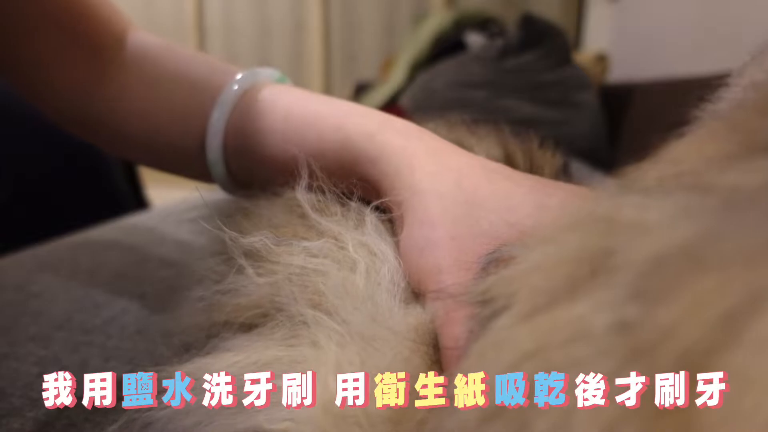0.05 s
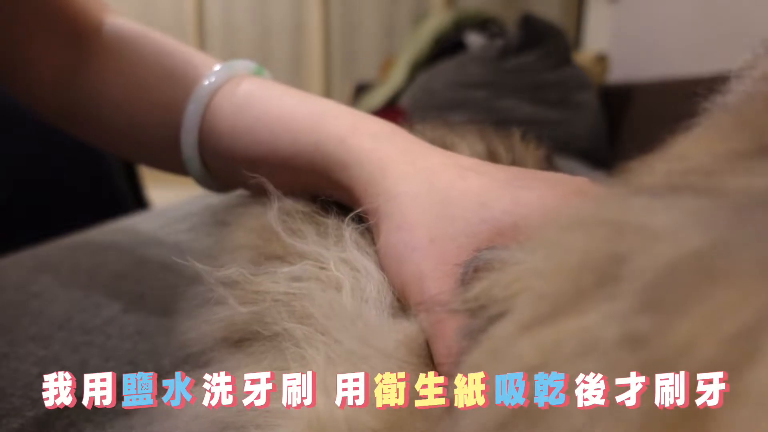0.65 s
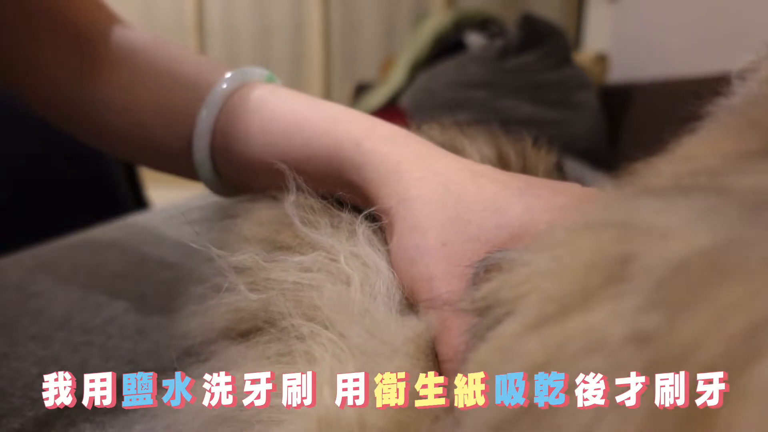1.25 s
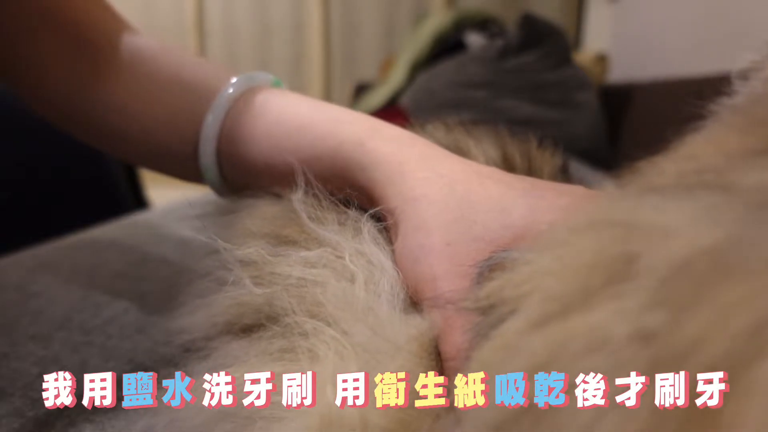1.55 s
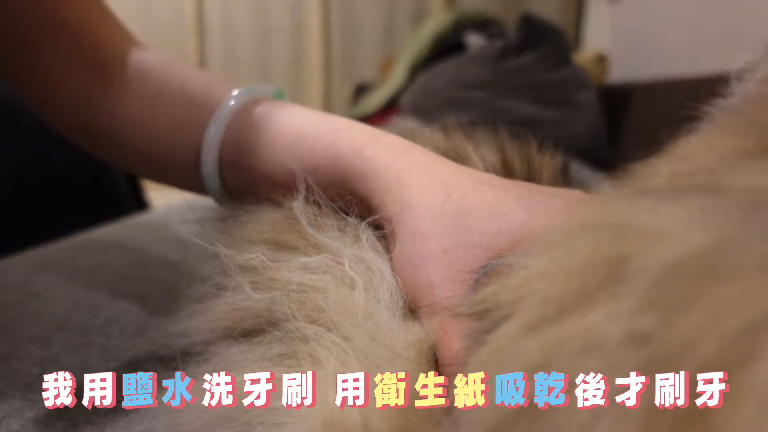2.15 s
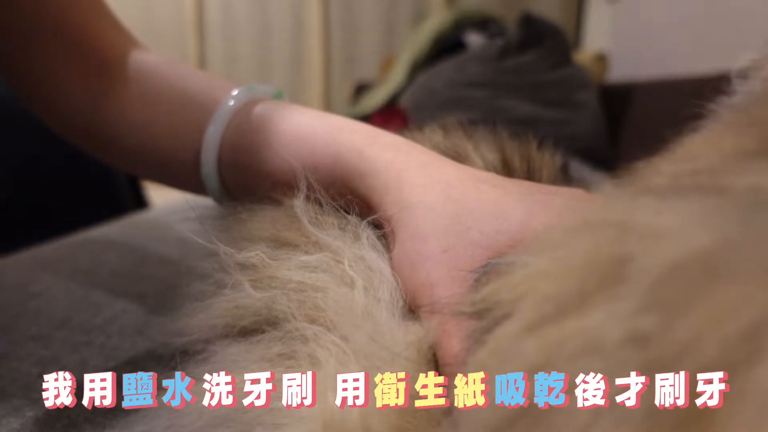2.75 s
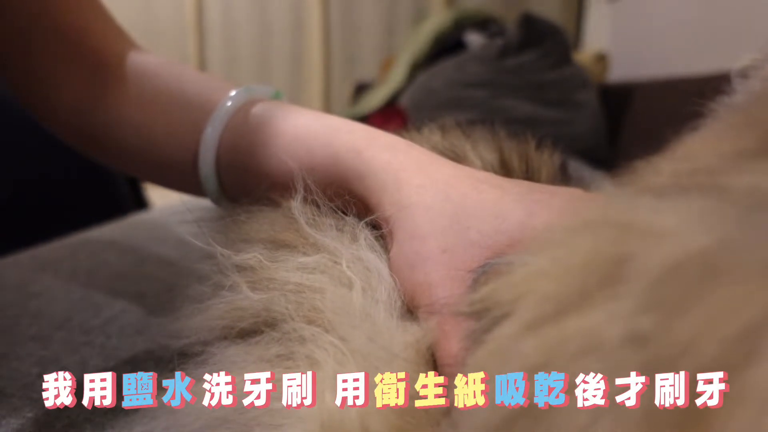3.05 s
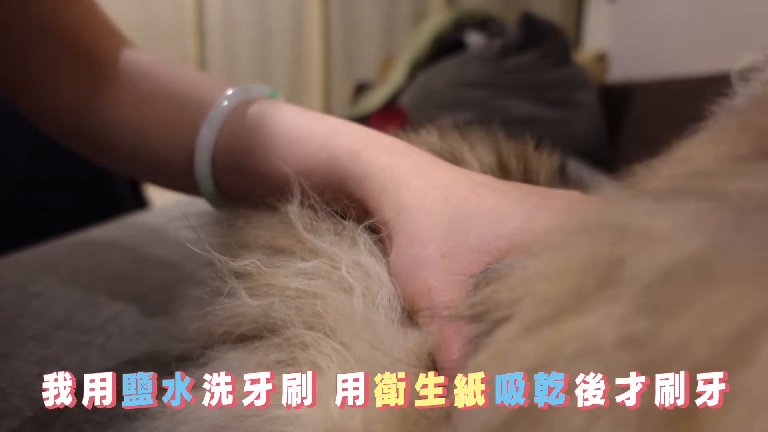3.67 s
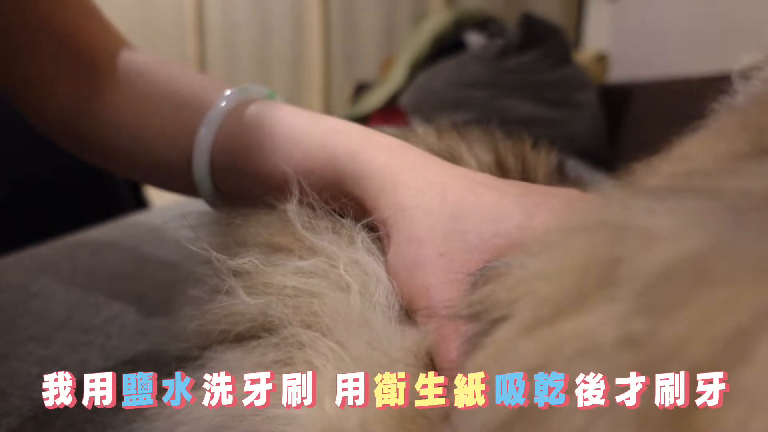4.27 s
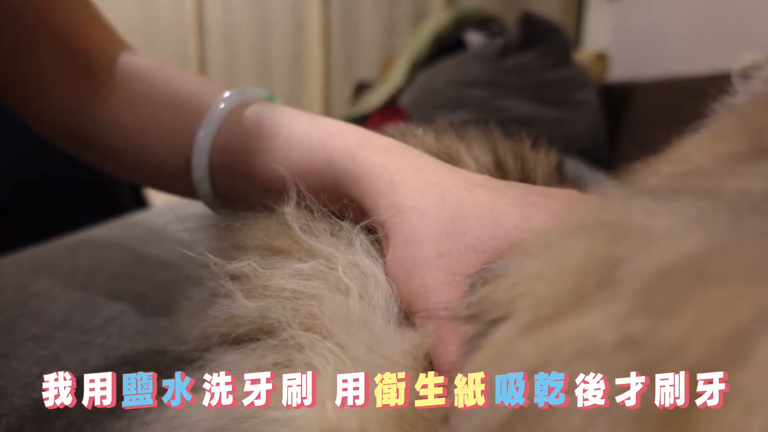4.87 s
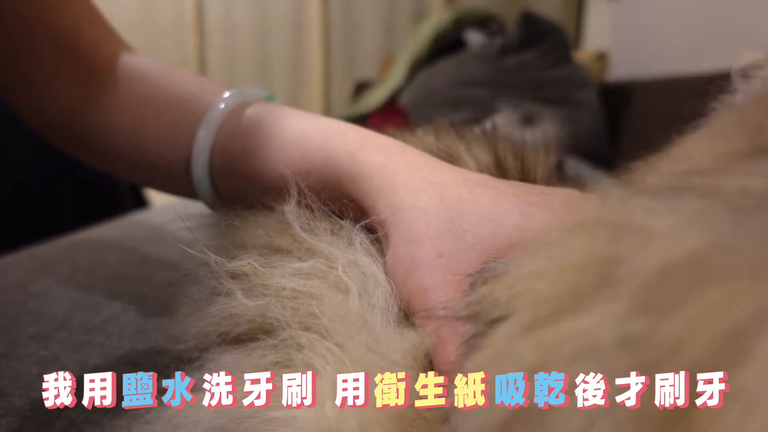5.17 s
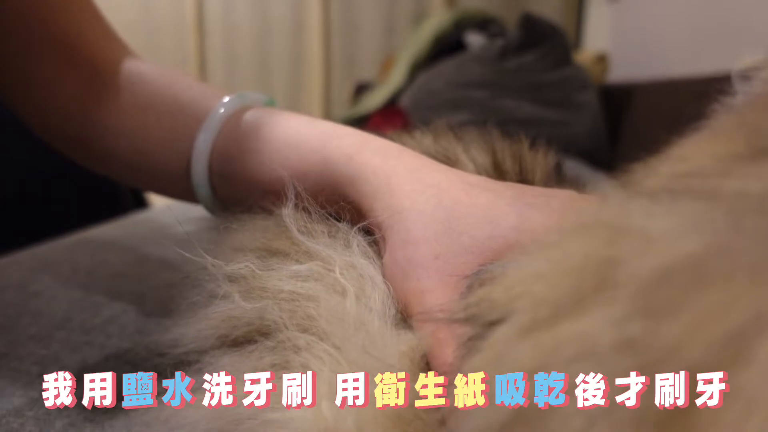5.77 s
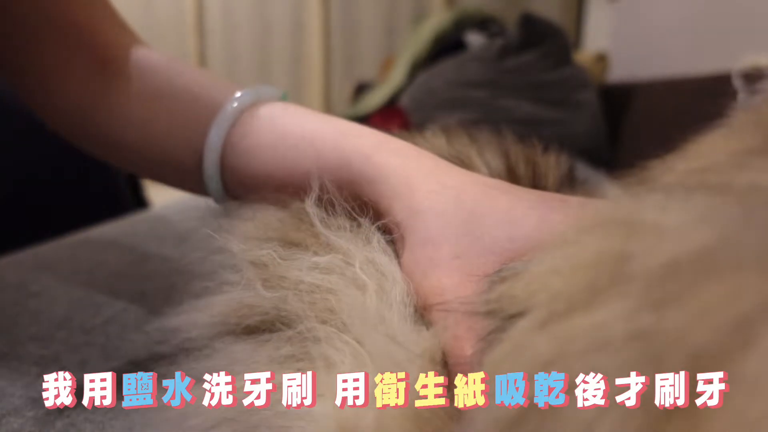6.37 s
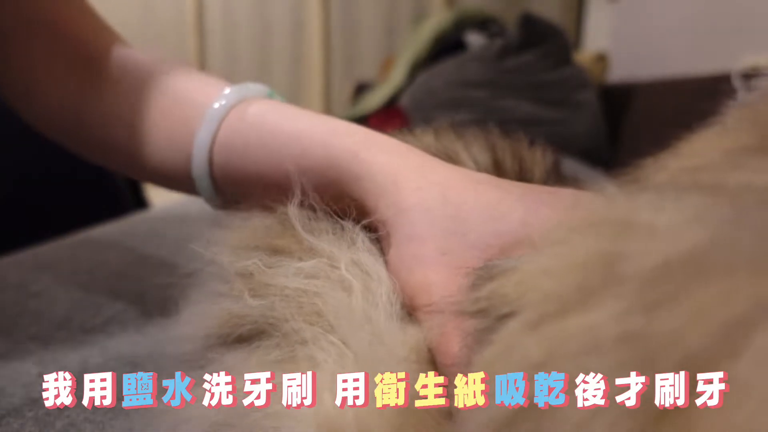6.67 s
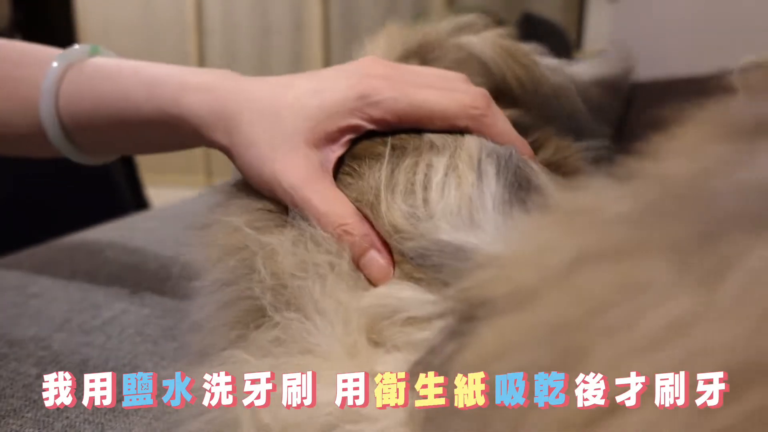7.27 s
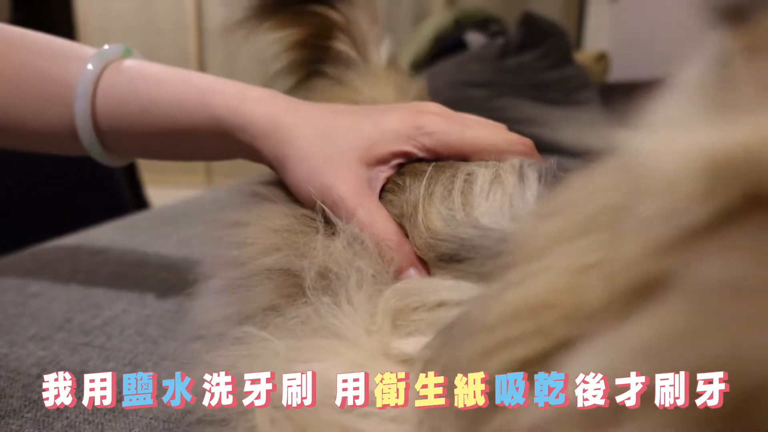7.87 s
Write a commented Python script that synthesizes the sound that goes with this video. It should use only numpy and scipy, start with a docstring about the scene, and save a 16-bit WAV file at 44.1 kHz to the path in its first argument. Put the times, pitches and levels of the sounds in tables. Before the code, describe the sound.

Soft fur rustling, then a toothbrush rubbing and scrubbing a dog's teeth with faint squeaks and small ticks, over low room hiss.

```python
"""A dog's teeth are brushed close to the microphone, over the soft hiss of a quiet room.
First a hand rustles in the fur, with one sharp tick; faint hollow tones come and go from here on.
At 1.8 s the brush scrubs briefly, then makes quick light strokes whose squeaks arch with their speed.
From 4.5 s heavier scrubs take over. Strokes swell to their hardest press and ease off, among dull
snags and later ticks. After 6 s the hand rustles again, with two last ticks."""
import sys
import numpy as np
from scipy import signal
from scipy.fft import rfft, irfft
from scipy.io import wavfile

SR = 44100
rng = np.random.default_rng(int(sys.argv[2]) if len(sys.argv) > 2 else 0)


def pcm_store(signal):
    """Save signal as 16-bit PCM."""
    levels = np.round(np.clip(np.atleast_2d(signal), -1, 1) * 32767)
    wavfile.write(sys.argv[1], SR, levels.astype(np.int16).T)


N = 349713
TIME, FREQ = np.arange(N) / SR, np.fft.rfftfreq(N, 1 / SR)


def amp(db):
    """Decibels to gain."""
    return 10 ** (np.asarray(db) / 20)


def unit_rms(x):
    """Scales to rms 1; a stereo pair by its mid signal."""
    return x / np.sqrt(np.mean(np.atleast_2d(x).mean(0) ** 2) + 1e-20)


def spectrum(table):
    """Table columns interpolated over log frequency."""
    hz, *columns = np.transpose(table)
    return [np.interp(np.log(FREQ + 1), np.log(hz + 1), column) for column in columns]


def wander(rate_hz):
    """Random drift, rms 1."""
    knots = np.arange(0, TIME[-1] + 1, 1 / rate_hz)
    return unit_rms(np.interp(TIME, knots, rng.standard_normal(N)[:len(knots)]))


def resonance(hz, half_width_hz):
    """Gain of a steep-skirted peak."""
    return 1 / (1 + ((FREQ - hz) / half_width_hz) ** 2 / 2) ** 2


def highpass(x, hz):
    """Steep zero-phase high-pass."""
    return irfft(rfft(x) / (1 + (hz / (FREQ + 1)) ** 12), N)


def bandpass(x, centre_hz, spread_oct):
    """Gaussian band on a log frequency axis."""
    hz = np.fft.rfftfreq(x.shape[-1], 1 / SR) + 1
    return irfft(rfft(x) * np.exp(-.5 * (np.log2(hz / centre_hz) / spread_oct) ** 2))


def pan(balance_db):
    """Left and right gains; positive is left."""
    return amp(np.vstack([balance_db / 2, -balance_db / 2]))


def stereo_noise(colour, image, envelope=1):
    """Two independent noises, modulated, filtered and mixed to left and right."""
    coherence, balance_db = spectrum(image)
    coherence = np.clip(coherence, 0, 1)
    left, other = rfft(rng.standard_normal((2, N)) * envelope) * colour
    right = coherence * left + np.sqrt(1 - coherence ** 2) * other
    return irfft(np.array([left, right]) * pan(balance_db), N)


def stroke(row, curve, fizz_follows):
    """Level and fizz along a stroke, easing off either side of the hardest press."""
    start_s, length_s, level_db, press, easing_db, fizz_db = row[:6]
    progress = np.linspace(0, 1, 33)
    drop_db = easing_db / 2 * (2 * abs(progress - press)) ** curve
    fizz_db = fizz_db + (1 - fizz_follows) * drop_db
    return np.transpose([start_s + length_s * progress, level_db - drop_db, fizz_db])


def contact(moves, attack_s, release_s):
    """Envelopes of body and fizz (treble); both stop when the surfaces part."""
    body, fizz = np.zeros((2, N))
    for move in moves:
        knots_s, level_db, fizz_db = np.transpose(move)
        start_s, end_s = knots_s[0], knots_s[-1]
        span = slice(max(int((start_s - attack_s) * SR), 0), int((end_s + release_s) * SR))
        t = TIME[span]
        touch = np.clip(np.minimum((t - start_s) / attack_s, (end_s - t) / release_s) + .5, 0, 1)
        body[span] += touch * amp(np.interp(t, knots_s, level_db))
        fizz[span] += touch * amp(np.interp(t, knots_s, level_db + fizz_db))
    return body, fizz


def friction(envelopes, colour, image, grain_db, clump_db, clump_hz, body_db, fizz_db, top_db, top_power):
    """Countless tiny slips, uneven and clumped, sound through a body."""
    body, fizz = envelopes
    slip_size = amp(grain_db * wander(3000) + clump_db * wander(clump_hz))
    rub = stereo_noise(colour, image, slip_size)
    treble = highpass(rub, 6600)
    low, treble = unit_rms(rub - treble), unit_rms(treble)
    top = highpass(treble, 7700)
    # faster sliding shortens the slips: the top grows faster than the rest of the fizz
    top_gain = amp(top_db) * np.clip(fizz / (body + 1e-9), .1, 1) ** top_power
    return amp(body_db) * body * low + amp(fizz_db) * fizz * (treble + (top_gain - 1) * top)


# hiss spectrum: (frequency [Hz], gain [dB])
AIR_SPECTRUM = [(25, -44), (60, -33), (120, -22), (220, -16.5), (400, -12), (600, -9), (720, -3), (900, -8),
                (1120, -0.5), (1700, -5.5), (2200, -5), (2900, -10.5), (6900, -16), (15500, -24.5)]
# stereo image: (frequency [Hz], coherence [0-1], left minus right [dB])
AIR_STEREO = [(60, .995, 5), (98, 0.93, -2.5), (249, 0.47, 2), (624, 0.16, -5.5), (1030, 0.03, 6),
              (2570, 0.11, 1), (7400, 0.1, 1.5), (13500, 0.97, 0)]
# room resonances: (frequency [Hz], half-width [Hz], level [dB], waver [dB])
AIR_MODES = [(97, 9, -97, 1), (603, 55, -73, 2.4), (1130, 110, -76, 1)]


def air(hiss_db=-60.5):
    """Steady room hiss with a few wavering resonances."""
    out = amp(hiss_db) * unit_rms(stereo_noise(amp(spectrum(AIR_SPECTRUM)[0]), AIR_STEREO))
    for hz, half_width_hz, level_db, waver_db in AIR_MODES:
        gain = amp(level_db + waver_db * wander(22))
        out += gain * unit_rms(stereo_noise(resonance(hz, half_width_hz), AIR_STEREO))
    return out


# hand moves, one curve each: (time [s], level [dB], fizz re level [dB])
FUR_MOVES = [
    [(0.0, -42, -5.5), (0.066, -52.5, -6), (0.12, -49.5, 1.5), (0.148, -55, -6), (0.23, -67, -4),
     (0.276, -57, -10), (0.3, -64, -6)],
    [(0.3, -60, -6), (0.39, -46.5, -5), (0.486, -52.5, -4.5), (0.494, -44.5, -4.5), (0.556, -53.5, -7),
     (0.628, -39.5, -7.5), (0.78, -58, -8)],
    [(0.78, -54, -7), (0.864, -49.5, -5), (0.888, -48, -8.5), (1.006, -50, -6.5), (1.04, -58, -5),
     (1.108, -51, -7), (1.15, -59.5, -4)],
    [(1.15, -54.5, -8), (1.216, -50.5, -3.5), (1.51, -54.5, -9.5), (1.608, -53.5, -8), (1.706, -62.5, -11),
     (1.734, -57.5, -11), (1.8, -72, -8)],
    [(6.07, -67, -4), (6.206, -58.5, -2), (6.28, -72, -3), (6.29, -74, 2)],
    [(6.53, -70, 1), (6.576, -73, 0.5), (6.74, -58, -4), (6.848, -61, -7.5), (7.258, -56.5, -6.5),
     (7.274, -63, -4), (7.38, -72, -6)],
]
# rustle spectrum: (frequency [Hz], gain [dB])
FUR_SPECTRUM = [(400, -37), (900, -33), (1500, -6), (2150, -6), (2900, -2.5), (3700, -0.5), (4300, -1.5),
                (5200, -1), (7000, -7.5), (9000, -11.5), (12000, -19.5), (15500, -29.5)]
# rustle resonances: (frequency [Hz], half-width [Hz], added part re spectrum [dB])
FUR_RESONANCES = [(2200, 37, -4), (3470, 120, -15), (4990, 57, -2.5), (5460, 94, -8.5), (6670, 120, -10)]
# stereo image: (frequency [Hz], coherence [0-1], left minus right [dB])
FUR_STEREO = [(600, .3, 8), (1300, 0.23, 3), (2550, 0.44, 9.3), (4800, 0.79, 4.1), (7350, 0.48, 7.5),
              (12000, 0.47, 2.5)]


def fur_rustle():
    """A hand slides through fur: soft, slightly hollow friction to the left."""
    peaks = sum(amp(db) * resonance(hz, half_width_hz) for hz, half_width_hz, db in FUR_RESONANCES)
    colour = amp(spectrum(FUR_SPECTRUM)[0]) * (1 + peaks)
    envelopes = contact(FUR_MOVES, attack_s=.013, release_s=.014)
    return friction(envelopes, colour, FUR_STEREO, grain_db=.5, clump_db=1.46, clump_hz=90,
                    body_db=-.5, fizz_db=-1, top_db=-.5, top_power=.16)


# hard contacts: (time [s], peak [dB], centre [Hz])
TICK_HITS = [(0.8915, -25.5, 3800), (4.523, -38, 1300), (5.651, -30, 3500), (5.7675, -37, 2400),
             (5.916, -28, 2600), (5.9185, -29, 3500), (5.953, -28, 2700), (5.9855, -29, 3300),
             (6.9475, -41, 2300), (7.251, -34, 2100)]


def ticks(decay_s=.0005, spread_oct=.8):
    """Single hard contacts: snaps that die within a millisecond or two."""
    out, t = np.zeros(N), np.arange(1024) / SR
    for time_s, peak_db, centre_hz in TICK_HITS:
        burst = rng.standard_normal(len(t)) * np.exp(-t / decay_s)
        snap = bandpass(np.roll(burst, 32), centre_hz, spread_oct)  # roll: space for pre-ringing
        out[int(time_s * SR):][:len(t)] += amp(peak_db) * snap / abs(snap).max()
    return out * pan(balance_db=2.4)


# swells: (peak time [s], length [s], frequency [Hz], half-width [Hz], level [dB], left minus right [dB])
HOLLOW_SWELLS = [(1.2, 0.074, 580, 32, -66.5, -2), (1.563, 0.65, 2080, 280, -53.5, 7.5),
                 (6.12, 0.15, 600, 50, -60.5, -16), (6.411, 0.042, 580, 45, -63, -18),
                 (6.86, .1, 250, 69, -76, -6), (7.184, 0.41, 3900, 570, -60, 3),
                 (7.0, 0.91, 1620, 700, -63, 2), (7.265, 0.05, 260, 60, -70, -2),
                 (7.78, 0.35, 626, 66, -60.5, -22), (7.76, 0.62, 2070, 180, -64.5, 0),
                 (7.7, .35, 4800, 900, -66, 9), (7.805, 0.022, 7200, 250, -61.5, 0)]


def hollow_tones():
    """Narrow noise bands that swell softly and fade."""
    out = np.zeros((2, N))
    for peak_s, length_s, hz, half_width_hz, level_db, balance_db in HOLLOW_SWELLS:
        swell = np.cos(np.pi * np.clip((TIME - peak_s) / length_s, -.5, .5)) ** 2
        tone = stereo_noise(resonance(hz, half_width_hz), image=[(hz, .5, balance_db)])
        out += amp(level_db) * swell * unit_rms(tone)
    return out


# heavy strokes: (start [s], length [s], level at hardest press [dB], press position [0-1],
# easing [dB per stroke length], fizz re level [dB])
SCRUB_STROKES = [ (1.815, 0.11, -46.5, 0.1, 4.5, -9), (1.914, 0.16, -45.5, 0.27, 14, -1.5),
                 (2.086, 0.11, -47, 0.42, 24, -7), (2.195, 0.14, -51, .3, 5.5, -1),
                 (3.713, 0.031, -50.5, 0.74, 7, -2.5), (4.11, 0.11, -56.5, 0.87, 6, 1.5),
                 (4.498, 0.025, -51.5, .5, 2, -7), (4.567, 0.14, -50, 0.6, 23, -11),
                 (4.844, 0.13, -45.5, 0.81, 13.5, -0.5), (5.092, 0.065, -52, 0.2, 7, -4),
                 (5.149, 0.1, -46.5, 0.8, 5, -1), (5.256, 0.042, -40.5, 0.73, 21.5, -2.5),
                 (5.344, 0.052, -49.5, 0.8, 5, -5.5), (5.392, 0.069, -50, 0, 3, -0.5),
                 (5.639, 0.13, -37.5, 0.33, 32, -4.5), (5.903, 0.098, -37, 0.42, 22.5, -5.5), ]
# scrub spectrum: (frequency [Hz], gain [dB])
SCRUB_SPECTRUM = [(150, -34.5), (300, -20), (520, -7), (850, -6), (1350, 2), (1750, 1), (2050, -2.5),
                  (2300, 2), (2650, 2), (3700, -1.5), (5600, 0), (8000, -7.5), (12000, -14), (15500, -26.5)]
# stereo image, scrubs and quick strokes: (frequency [Hz], coherence [0-1], left minus right [dB])
BRUSH_STEREO = [(480, 0.98, 1.5), (1300, 0.7, 4.5), (2600, .8, 3.5), (4800, 0.98, 2.5), (7500, 1, 1.5),
                (12000, 1, 0.2)]


def scrubs():
    """Bristles rub hard on teeth: broad, coarse friction."""
    moves = [stroke(row, curve=.79, fizz_follows=1.08) for row in SCRUB_STROKES]
    envelopes = contact(moves, attack_s=.013, release_s=.015)
    colour = amp(spectrum(SCRUB_SPECTRUM)[0])
    return friction(envelopes, colour, BRUSH_STEREO, grain_db=2, clump_db=1.08, clump_hz=150,
                    body_db=-.4, fizz_db=-.37, top_db=2, top_power=.45)


# brush snags: (peak time [s], level [dB], length [s], centre [Hz], spread [oct])
SNAG_DRAGS = [(1.865, -47.5, .019, 1330, 0.74), (2.145, -52.5, 0.069, 1120, 0.82),
              (2.199, -49.5, .012, 1200, 1), (2.404, -43, .009, 1440, .25),
              (2.853, -42.5, 0.011, 1394, 0.44), (3.071, -47, .014, 1550, .27),
              (3.104, -53.5, 0.011, 792, 1.2), (3.825, -52.5, 0.012, 1542, 0.19),
              (3.964, -50.5, 0.014, 1598, .1), (4.077, -51, 0.033, 1200, .8),
              (4.095, -47.5, 0.015, 1000, 0.91), (4.524, -47, 0.00804, 910, .61),
              (4.945, -48, 0.022, 1190, 0.93), (5.222, -48.5, 0.042, 1120, 1),
              (5.288, -45, 0.013, 1200, 0.23), (5.953, -47.5, 0.054, 900, 0.83),
              (7.252, -49, 0.013, 998, 0.77)]


def snags(judder_db=2, stereo_width=.6):
    """The brush head drags for a moment and judders, low and coarse."""
    out, t = np.zeros((2, N)), np.arange(4096) / SR
    judder = amp(judder_db * wander(900))
    for peak_s, level_db, length_s, centre_hz, spread_oct in SNAG_DRAGS:
        start = int((peak_s - length_s / 2) * SR)
        span = slice(start, start + len(t))
        mid, side = bandpass(rng.standard_normal((2, len(t))) * judder[span], centre_hz, spread_oct)
        pair = np.array([mid + stereo_width * side, mid - stereo_width * side])
        drag = np.maximum(1 - (2 * t / length_s - 1) ** 2, 0)
        out[:, span] += amp(level_db) * drag * unit_rms(pair)
    return out * pan(balance_db=2)


# light strokes: (start [s], length [s], level at hardest press [dB], press position [0-1],
# easing [dB per stroke length], fizz re level [dB], top squeak pitch [Hz], squeak gain [dB])
QUICK_STROKES = [ (1.929, 0.11, -49, 0.5, 5, -7, 3950, 1), (2.039, 0.1, -52, 0.73, 11, 3.5, 5420, 2.5),
                 (2.203, .1, -52.5, 0.4, 4, -3, 4597, 1.5), (2.304, 0.1, -42, 0.66, 10, -3, 4720, -12),
                 (2.438, 0.086, -47.5, 0.26, 5, -1.5, 5920, -1.5),
                 (2.55, .089, -44, 0.52, 4, -4.5, 4500, -10), (2.662, 0.1, -46, 0.2, 9, -3.5, 5360, -6),
                 (2.771, 0.091, -39.5, 0.43, 10.5, -6, 4590, -10),
                 (2.885, 0.091, -44.5, .3, 17, -2, 5100, -14), (2.983, 0.099, -42, 0.54, 13, -3, 5380, -1),
                 (3.101, 0.085, -47, .05, 11.5, -1, 5000, -12),
                 (3.615, .095, -50.5, 0.87, 2.5, -4.5, 5010, -3),
                 (3.742, .083, -43.5, 0.9, 5.5, -9.5, 5886, 3),
                 (3.85, .097, -43.5, 0, 11.5, -8.5, 5620, -4.5), (3.962, .128, -47, 0.32, 1, -11, 4600, -2),
                 (4.1, 0.11, -48.5, 0.36, -0.5, -8.5, 3970, -8),
                 (4.552, .12, -50.5, 0.58, 7.5, -1, 4620, -15), ]
# light stroke spectrum: (frequency [Hz], gain [dB])
QUICK_SPECTRUM = [(300, -44), (700, -21), (1150, -8), (1580, 3), (1900, -11.5), (2350, -6.5), (2800, -10.5),
                  (3700, -9), (4300, 7.5), (5350, 5.5), (6200, -7), (8000, -9.5), (11000, -3.5),
                  (15500, -18)]


def quick_strokes():
    """Bristles rub lightly: friction that rings near 5 kHz."""
    colour = amp(spectrum(QUICK_SPECTRUM)[0])
    return friction(quick_contact(), colour, BRUSH_STEREO, grain_db=1, clump_db=0, clump_hz=170,
                    body_db=-2, fizz_db=-1.7, top_db=-3.5, top_power=.1)


def quick_contact():
    """Light strokes bite at once; their share of fizz hardly depends on pressure."""
    moves = [stroke(row, curve=.98, fizz_follows=.9) for row in QUICK_STROKES]
    return contact(moves, attack_s=.003, release_s=.008)


# tufts squeaking together: (pitch re main tuft [ratio], gain [dB], pitch jitter [fraction])
BRISTLE_TUFTS = [(1, 0, .014), (.9, -11, .04), (1.12, -11, .04)]


def squeaks(fastest_at=.44, half_swing=.6, overtone_db=-8.5, flutter_db=2.5):
    """Ridges pass each tuft at a rate set by stroke speed; the squeak swells on crossing a resonance."""
    main_hz, gain, out = np.zeros((3, N))
    for start_s, length_s, *_, top_hz, gain_db in QUICK_STROKES:
        # in stroke lengths: speed peaks at fastest_at and would reach zero half_swing either side
        swing = ((TIME - start_s) / length_s - fastest_at) / half_swing
        moving = abs(swing) < 1
        main_hz[moving] = top_hz * np.cos(np.pi / 2 * swing[moving])
        gain[moving] = amp(gain_db)
    body, fizz = quick_contact()
    for ratio, tuft_db, jitter in BRISTLE_TUFTS:
        pitch_hz = ratio * main_hz
        phase = 2 * np.pi * np.cumsum(pitch_hz * (1 + jitter * wander(2000))) / SR
        resonance_db = np.interp(pitch_hz, [800, 1550, 2200, 3400, 4200, 5300, 6100],
                                 [-30, -11, -21, -11, 4, 2.5, -7])
        tone = body * amp(resonance_db) * np.sin(phase)
        for harmonic in (2, 3):
            in_fizz_band = np.interp(harmonic * pitch_hz, [8000, 11500, 13500, 15000], [0, 1, .9, 0])
            tone += fizz * amp(overtone_db) * in_fizz_band * np.sin(harmonic * phase)
        out += tone * amp(tuft_db + flutter_db * wander(460))
    return out * gain * pan(balance_db=3)


def room(x, early_db=-15, early_t60_s=.1, late_db=-19, late_t60_s=.5, lowpass_hz=6000):
    """Early reflections from nearby surfaces and the short tail of a furnished room."""
    t = np.arange(SR // 2) / SR
    late, early = rng.standard_normal((2, 2, len(t))) * (t > .002)
    late *= amp(-60 * t / late_t60_s)
    early *= amp(-60 * t / early_t60_s)
    response = amp(late_db) * late / np.linalg.norm(late[0])
    response += amp(early_db) * early / np.linalg.norm(early[0])
    response = signal.lfilter(*signal.butter(1, lowpass_hz, fs=SR), response)
    return signal.fftconvolve(x, response, axes=1)[:, :N]


def scene():
    """Brush and fur with their reflections, over the background."""
    near = quick_strokes() + scrubs() + fur_rustle() + squeaks() + ticks() + snags()
    return near + room(near) + hollow_tones() + air()


def record(dry, mono_below_hz=130, band_limit_hz=15750):
    """Two close microphones hear the bass alike; the recorder limits the band."""
    mid, side = (dry[0] + dry[1]) / 2, (dry[0] - dry[1]) / 2
    side = irfft(rfft(side) * FREQ / np.hypot(FREQ, mono_below_hz), N)
    pair = np.array([mid + side, mid - side])
    lowpass = signal.firwin(511, band_limit_hz, window=("kaiser", 9), fs=SR)
    return signal.oaconvolve(pair, lowpass[None], "same")


dry = scene()
out = record(dry)
pcm_store(out)
```